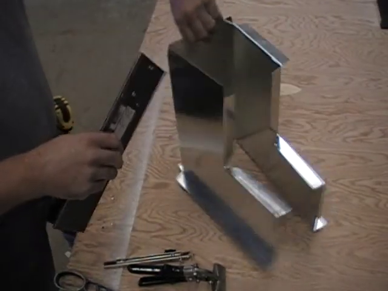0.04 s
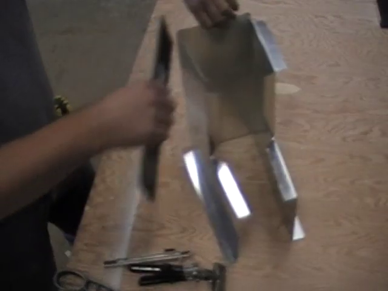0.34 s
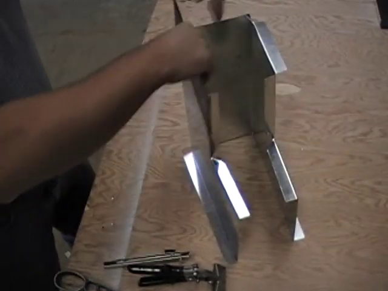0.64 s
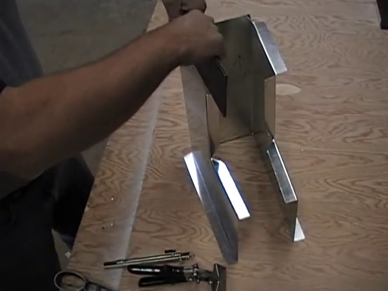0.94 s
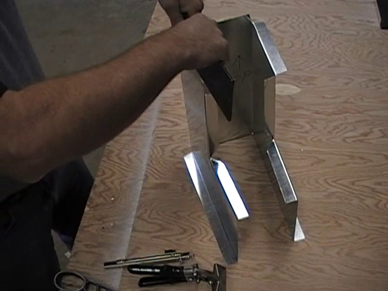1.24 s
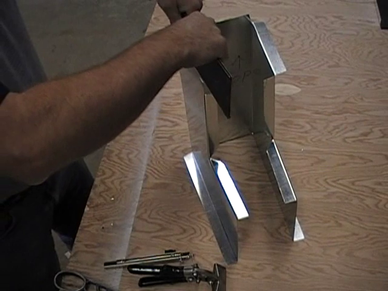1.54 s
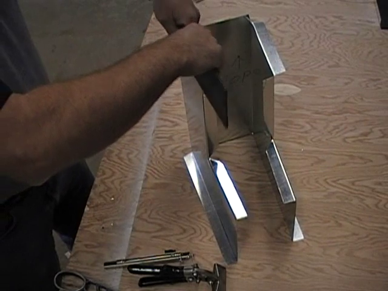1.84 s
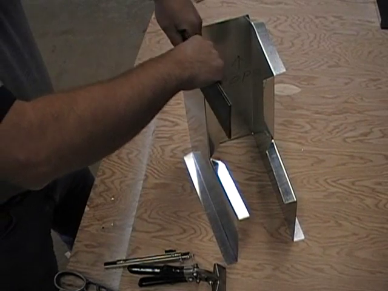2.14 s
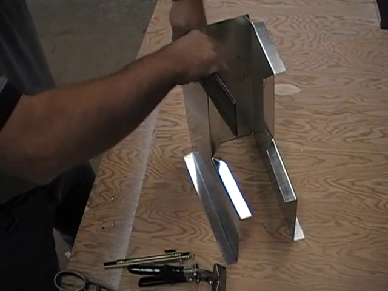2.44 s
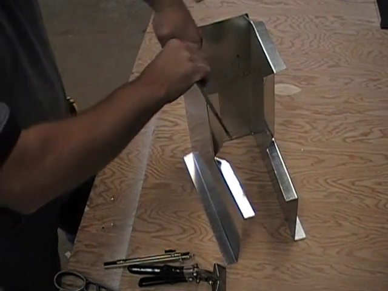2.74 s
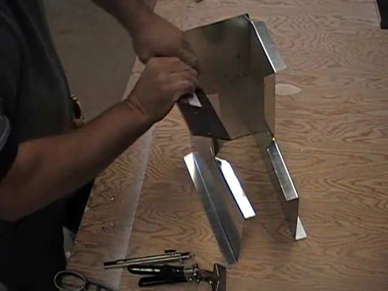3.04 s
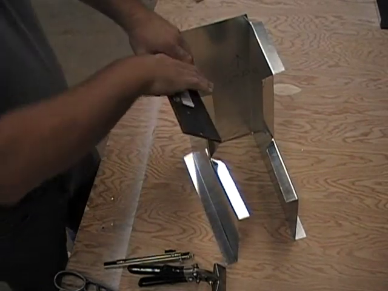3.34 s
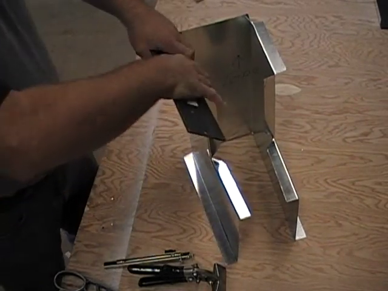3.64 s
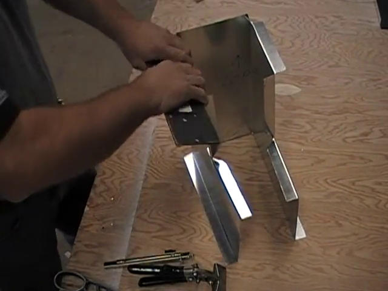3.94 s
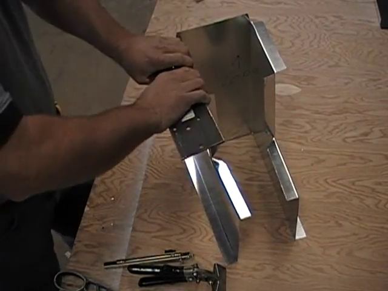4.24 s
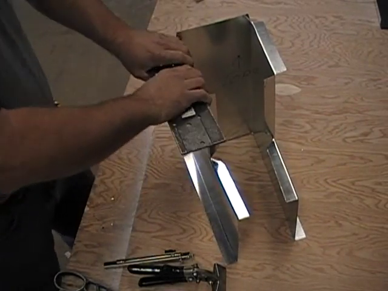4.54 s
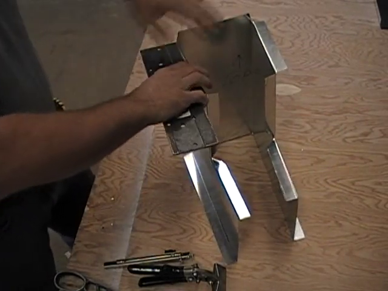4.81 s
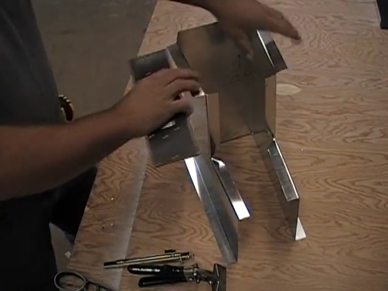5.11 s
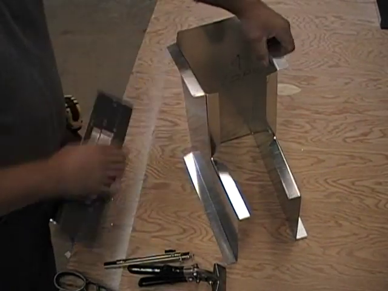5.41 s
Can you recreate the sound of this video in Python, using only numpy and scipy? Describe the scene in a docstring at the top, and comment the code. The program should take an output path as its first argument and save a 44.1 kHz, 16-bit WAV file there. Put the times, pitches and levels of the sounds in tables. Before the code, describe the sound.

In a workshop, a thin sheet-metal box is turned and clatters down on a wooden bench. A steel folding tool grates over its edge, rings and snaps into place with a sharp knock. The panel buckles in dull thumps, among dry clicks and faint rubbing of hands. The tool scrapes off and a metal flap rings briefly. The microphone is close, with a fan rumbling steadily behind.

```python
"""A workshop, close to a wooden bench, with a fan rumbling behind. A sheet-metal box is turned round and
clatters down, each impact exciting its normal modes. A steel folding tool grates over one edge by
stick-slip friction, rings, snaps home and bends it; the panel buckles with dull thumps, the tool ticks
in its seat and hands rub the metal. The tool is scraped off again and a plucked flap rings in free
vibration. The sound is nearly mono."""
import sys
import numpy as np
from scipy import signal
from scipy.fft import rfft, irfft, next_fast_len
from scipy.io import wavfile

SR = 44100
rng = np.random.default_rng(int(sys.argv[2]) if len(sys.argv) > 2 else 0)


def bounce(signal):
    """Save signal as a 16-bit WAV file at the path given by the first command-line argument."""
    frames = np.transpose(np.atleast_2d(signal))
    limited = np.clip(frames, -1, 1)
    pcm = np.round(limited * 32767).astype(np.int16)
    wavfile.write(sys.argv[1], SR, pcm)


N = 245637
TIME = np.arange(N) / SR
BANDS_HZ = 31.25 * 2 ** (np.arange(19) / 2)


def from_db(db):
    """Amplitude ratio of a level in decibels."""
    return 10 ** (np.asarray(db) / 20)


def at_hz(points, hz):
    """Interpolation of a table on a logarithmic frequency axis."""
    points = np.array(points)
    return np.interp(np.log(hz), np.log(points[:, 0]), points[:, 1])


def add(out, start_s, sound):
    """Superposition: a sound adds to those already present."""
    start = max(round(start_s * SR), 0)
    out[:, start:start + sound.shape[1]] += sound[:, :N - start]


# the bench and the fan lie to the left: frequency_hz, left_minus_right_db
BALANCE = [(100, 3), (280, 4), (650, 2), (1300, 0.9), (10000, 0)]
def stereo_gains(hz):
    """Level difference between the channels gives a source its direction."""
    return from_db(at_hz(BALANCE, hz) * np.array([[.5], [-.5]]))


def band_bank(spacing_hz, modal_share, width):
    """A thin plate has constant modal density: such modes over diffuse noise, in half-octave bands."""
    size = next_fast_len(N)
    hz = np.arange(size // 2 + 1) * SR / size + 1
    mode_hz = spacing_hz * np.cumsum(rng.uniform(.1, 1.9, 1000))
    is_mode = np.isin(np.arange(len(hz)), (mode_hz * size / SR).astype(int))
    share = modal_share * hz ** 2 / (hz ** 2 + 900 ** 2)  # the modes fade out below 900 Hz
    noise = rfft(rng.standard_normal((2, size))) / np.sqrt(size)
    modes = noise / abs(noise) * np.sqrt(share * is_mode / is_mode.mean())
    mid, side = noise * np.sqrt(1 - share) + modes
    stereo = mid + width * side * [[1], [-1]]
    bands = []
    for centre_hz in BANDS_HZ:
        triangle = np.maximum(1 - 2 * abs(np.log2(hz / centre_hz)), 0)
        band = irfft(stereo * triangle, size)[:, :N]
        bands.append(band / band.std() * stereo_gains(centre_hz))
    return np.array(bands, dtype=np.float32)


# decay of the dense upper modes and the room, at a ring_scale of 1: frequency_hz, t60_s
DENSE_DECAY = [(100, 1.19), (300, 1.71), (700, 1.344), (1800, 1.05), (4800, 0.6), (13000, 0.47)]
# share of the crack in a blow: frequency_hz, level_db
CRACK_SPECTRUM = [(100, 1.5), (600, 2), (2000, -16), (5000, -8), (10000, -1)]
def dense_ring(bank, start_s, band_db, ring_scale, crack_db, crack_s):
    """Frequency-dependent damping: after a brief crack, each band of modes decays at its own rate."""
    start = max(round(start_s * SR), 0)
    bands = bank[:, :, start:start + 3 * SR // 2]
    t = TIME[:bands.shape[2]].astype(np.float32)
    decay = np.float32(np.log(1000) / (at_hz(DENSE_DECAY, BANDS_HZ) * ring_scale))[:, None]
    crack = np.float32(from_db(crack_db + at_hz(CRACK_SPECTRUM, BANDS_HZ)))[:, None]
    attack = 1 - np.exp(-t / (0.021 * crack_s))
    envelope = (np.exp(-decay * t) + crack * np.exp(-t / crack_s)) * attack
    return np.einsum("bct,bt->ct", bands, envelope * np.float32(from_db(band_db))[:, None])


def modal_ring(modes, level_db, ring_scale, scatter_db, flex=0.00819):
    """Normal modes ring as damped sinusoids; the sheet's flexing detunes them from blow to blow."""
    hz, mode_db, t60_s = np.transpose(modes)
    t = TIME[:2 * SR].astype(np.float32)
    strength, sign, detune = rng.standard_normal((len(hz), 3)).T
    gains = np.sqrt(2) * from_db(mode_db + level_db + scatter_db * strength) * np.sign(sign)
    omega = np.float32(2 * np.pi * hz * (1 + flex * detune))[:, None]
    decay = np.float32(np.log(1000) / (t60_s * ring_scale))[:, None]
    return (stereo_gains(hz) * gains) @ (np.sin(omega * t) * np.exp(-decay * t))


# broadband rumble of the fan: frequency_hz, band_level_db
FAN_SPECTRUM = [(30, -78), (45, -69), (65, -69), (90, -59), (125, -57), (280, -57), (450, -57), (750, -53),
                (1200, -59), (2000, -63), (2900, -70), (5000, -73), (8000, -72), (11300, -79), (16000, -92)]
# drones of the fan: pitch_hz, width_hz, level_db
FAN_DRONES = [(43.8, 2.5, -59), (95.3, 5.4, -50.5)]
def fan(air):
    """Steady broadband noise, with drones that waver as narrow-band noise does."""
    out = np.einsum("bct,b->ct", air, np.float32(from_db(at_hz(FAN_SPECTRUM, BANDS_HZ))))
    for hz, width_hz, level_db in FAN_DRONES:
        bandpass = signal.butter(2, [hz - width_hz / 2, hz + width_hz / 2], "band", fs=SR, output="sos")
        drone = signal.sosfilt(bandpass, rng.standard_normal(N + SR))[SR:]
        out = out + from_db(level_db) * stereo_gains(hz) * drone / drone.std()
    return out


def slips(per_s, spread_db):
    """Stick-slip friction: a random train of uneven impulses, rms 1."""
    clicks = (rng.random(N) < per_s / SR) * rng.choice([-1, 1], N)
    clicks = clicks * from_db(spread_db * np.minimum(rng.exponential(1, N), 4))
    return clicks / clicks.std()


def through_sheet(force, bank, spectrum, ring_scale, direct_db):
    """Convolution of a force with the sheet's impulse response: a direct click and a damped ring."""
    band_db = at_hz(spectrum, BANDS_HZ)
    response = dense_ring(bank, 0, band_db, ring_scale, direct_db, crack_s=0.00096)
    response *= np.sqrt(np.sum(from_db(band_db) ** 2) / np.sum(response ** 2) * 2)
    return signal.fftconvolve(force[None], response, axes=1)[:, :N]


# steel slides on the sheet: start_s, length_s, level_db
SCRAPES = [(0.0, 0.0072, -27), (0.143, 0.066, -40), (0.278, 0.15, -32), (0.939, 0.19, -46.5),
           (1.682, 0.034, -39), (1.846, 0.19, -32.5), (4.857, 0.052, -32), (5.055, 0.088, -29.5),
           (5.18, 0.022, -39.5), (5.356, 0.24, -47.5)]
# response of the sheet to a steel edge: frequency_hz, band_level_db
EDGE_SPECTRUM = [(40, -41), (200, -24), (700, -27), (1200, -4.5), (2000, -10.5), (3000, -12), (4800, -2.5),
                 (7000, -9), (9500, -0.5), (14000, -34)]
def scrapes(plate):
    """Stick-slip of a steel edge, its burrs catching: each stroke bites, swells, holds and lets go."""
    bite_db, swell_share, release_db_per_s = -12.5, 0.6, 229
    grit = slips(per_s=1400, spread_db=2)
    burrs = from_db(-7) * slips(per_s=70, spread_db=1)
    strokes = np.zeros(N)
    for start_s, length_s, level_db in SCRAPES:
        t = TIME - start_s
        swell = np.clip(t / (swell_share * length_s), 0, 1)
        release_db = release_db_per_s * np.clip(t - length_s, 0, 1)
        strokes += (t >= 0) * from_db(level_db + bite_db * (1 - swell) - release_db)
    return through_sheet(strokes * (grit + burrs), plate, EDGE_SPECTRUM, ring_scale=0.19, direct_db=22)


# distinct modes of the box: pitch_hz, level_db, t60_s
BOX_MODES = [(121.2, -16, 2.4), (265, -16, 2.3), (296, -12, 1.98), (305, -15, 2.96), (344.5, -12.5, 0.8),
             (418, -30.5, 3.1), (495, -20, 3.95), (547.6, -17.5, 1.64), (617.5, -14.5, 1.9),
             (666, -10.5, 1.63), (744, -26, 0.74), (754, -14.5, 1.8), (820, -29, 2.2), (924, -31, 1.1),
             (1042, -18.5, 1.4), (1063, -7, 0.37), (1457, -18, 1.1), (1640, -17.5, 1.34),
             (1904, -26.5, 2.3), (2202, -17.5, 0.85), (2480, -55, 0.76), (2803, -27, 0.58),
             (2940, -13.5, 0.88), (4700, -19, 0.26)]
# dense modes of the box: frequency_hz, band_level_db
BOX_SPECTRUM = [(40, -34), (70, -28), (110, -22), (220, -16), (310, -16), (470, -17.5), (700, -12),
                (1000, -12.5), (1900, -8.5), (3000, -13), (4800, -2.5), (7000, -7.5), (9500, -2),
                (14000, -37)]
def strike(plate, start_s, force, crack_db, ring_scale):
    """Impact excitation: the force spectrum weights the box's distinct and dense modes alike."""
    sound = modal_ring(BOX_MODES, at_hz(force, np.array(BOX_MODES)[:, 0]), ring_scale, scatter_db=2)
    band_db = at_hz(force, BANDS_HZ) + at_hz(BOX_SPECTRUM, BANDS_HZ)
    dense = dense_ring(plate, start_s, band_db, ring_scale, crack_db, crack_s=0.012)
    sound[:, :dense.shape[1]] += dense
    return sound


# tool and hands hit the box: start_s, level_db, boom_db, clang_db, firmness (0 glancing, 1 pressed home)
KNOCKS = [(0.001, -26.5, -0.5, 0.5, 0.15), (0.114, -35.5, 0, 3.5, 0.25), (0.513, -36.5, 0, 5.5, 0.67),
          (1.029, -29, -7.5, 6, 0.64), (1.243, -49, -15, 4, 0.95), (1.325, -44, -12, -5, 0.89),
          (1.687, -38, -35.5, -4, 0.1), (1.899, -38.5, 1.5, 1, 0.16), (2.049, -20.5, -2, -5, 0.96),
          (4.020, -58, -8, -3, 1), (4.865, -42, -20, 0.5, 0.78), (4.896, -36, -21, 0.5, 0.5),
          (4.996, -57, -9, 3, 0.95), (5.195, -36.5, -4, 3.5, 0.71)]
def knocks(plate):
    """The point of impact sets boom and clang; firm contact cracks harder and damps the ring."""
    glancing_crack_db, firm_crack_db = -4, 8.5
    glancing_ring, firm_ring = 1.53, 0.39
    out = np.zeros((2, N))
    for start_s, level_db, boom_db, clang_db, firmness in KNOCKS:
        force = [(300, level_db + boom_db), (700, level_db + clang_db),
                 (1900, level_db), (5000, level_db - 2.5)]
        crack_db = glancing_crack_db + firmness * (firm_crack_db - glancing_crack_db)
        ring_scale = glancing_ring + firmness ** 2 * (firm_ring - glancing_ring)
        add(out, start_s, strike(plate, start_s, force, crack_db, ring_scale))
    return out


# force spectrum of the box landing on the bench: frequency_hz, level_db, loss_per_bounce_db
LANDING_FORCE = [(110, -20, 3.5), (302, -15, 4.5), (660, -16, 2.84), (1830, -27.5, 1.24),
                 (5100, -32.5, 1.7)]
def landing(plate):
    """Inelastic impacts: the box lands on an edge, slaps flat and rocks, losing bass before treble."""
    start_s, first_gap_s, gap_growth = 0.227, 0.027, 1.14
    out = np.zeros((2, N))
    for contact in range(7):
        bounces = max(contact - 1, 0)
        force = [(hz, level_db - bounces * loss_db) for hz, level_db, loss_db in LANDING_FORCE]
        crack_db, ring_scale = (14.5, 0.97) if contact == 0 else (-26, 0.61)
        add(out, start_s, strike(plate, start_s, force, crack_db, ring_scale))
        start_s += first_gap_s * gap_growth ** contact
    return out


# knocks that ring the tool: start_s, level_db
TOOL_PINGS = [(1.027, -37.5), (1.327, -45), (2.050, -37), (5.196, -40)]
# modes of the tool: pitch_hz, level_db, t60_s
TOOL_MODES = [(2770, -22, 0.55), (2960, -16.5, 1), (2990, -14, 0.62), (4240, -10, 0.28),
              (4400, -26.5, 0.93), (5700, -26, 1), (5540, -9, .55), (5840, -24, 0.63), (6900, -4, 0.36),
              (7670, -12, 0.32), (7700, -49, 0.29), (8660, -46, 0.23)]
def tool_pings():
    """Free vibration of the knocked steel tool: high, clear modes of fixed pitch."""
    out = np.zeros((2, N))
    for start_s, level_db in TOOL_PINGS:
        add(out, start_s, modal_ring(TOOL_MODES, level_db, ring_scale=1, scatter_db=1, flex=0))
    return out


# the panel buckles under the tool: start_s, level_db, upper_modes_db, ring_scale
THUMPS = [(1.755, -39.5, 6.5, 2.3), (2.497, -32, -4.5, .8), (2.527, -35, -19, 0.92),
          (3.645, -24.5, 1, 1.25), (4.018, -28.5, 4.5, 1.08), (4.653, -28, 5, 1.05),
          (4.821, -30.5, -3.5, 1.7)]
# dense modes of the buckling panel: frequency_hz, band_level_db
THUMP_SPECTRUM = [(40, -22), (80, -22), (140, -13), (290, -14), (470, -19), (700, -18.5), (1050, -25),
                  (1700, -26), (3000, -29.5), (14000, -40)]
# modes of the panel while hands hold it: pitch_hz, level_db, t60_s
HELD_MODES = [(135, -16, 0.11), (176, -14.5, 0.62), (240, -11.5, 0.95), (267, -5, 0.27), (291, -7.5, 0.96),
              (343.6, -7, 0.69), (404, -11, 0.11), (471, -8.5, 0.26), (536, -18.5, 0.37), (651, -19, 0.85),
              (743, -10.5, 0.55), (1550, -23, 0.53)]
# first swing of the panel, soon stopped by the hands: pitch_hz, level_db, t60_s
POP_MODES = [(211, -3.5, 0.066), (345.4, -0.5, 0.055), (658, -13, 0.075), (836, -13, 0.056)]
def thumps(plate):
    """Snap-through buckling of the held panel: a soft push that reaches only its low modes."""
    out = np.zeros((2, N))
    for start_s, level_db, upper_db, ring_scale in THUMPS:
        force = [(330, level_db), (700, level_db + upper_db)]
        band_db = at_hz(force, BANDS_HZ) + at_hz(THUMP_SPECTRUM, BANDS_HZ)
        dense = dense_ring(plate, start_s, band_db, 0.55 * ring_scale, crack_db=-16.5, crack_s=0.017)
        add(out, start_s, dense)
        for modes in (HELD_MODES, POP_MODES):
            drive_db = at_hz(force, np.array(modes)[:, 0]) - 3
            add(out, start_s, modal_ring(modes, drive_db, ring_scale, scatter_db=3.5))
    return signal.sosfilt(signal.butter(2, 2200, fs=SR, output="sos"), out)


# hands and tool rub lightly over the metal: start_s, length_s, level_db
RUBS = [(2.188, 0.46, -48.5), (2.576, 0.13, -58.5), (2.742, 0.18, -58), (2.855, 0.72, -67),
        (3.396, 0.12, -54.5), (3.477, 0.26, -48), (3.72, 0.45, -67.5)]
# hiss of rubbing: frequency_hz, band_level_db
RUB_SPECTRUM = [(40, -60), (900, -12), (2800, -14), (4800, -9), (8500, 1.5), (14000, -12)]
def rubs(air):
    """Sliding friction of skin and flat steel: a hiss that swells and fades with the hand's speed."""
    strokes = np.zeros(N)
    for start_s, length_s, level_db in RUBS:
        progress = np.clip((TIME - start_s) / length_s, 0, 1)
        strokes += from_db(level_db) * np.sin(np.pi * progress) ** 2
    force = strokes * slips(per_s=7500, spread_db=6)
    return through_sheet(force, air, RUB_SPECTRUM, ring_scale=0.37, direct_db=-7)


# the clamped tool shifts in its seat: start_s, level_db, low_cutoff_hz
TICKS = [(2.537, -32, 3500), (2.935, -42, 1800), (2.963, -42, 1800), (2.990, -20, 700), (2.992, -21, 1200),
         (3.748, -26, 800), (4.241, -36, 2500), (4.776, -35, 9500), (4.785, -33, 9500), (4.843, -35, 4000)]
def ticks(plate):
    """Single impulses on the sheet make dry clicks; the smallest contacts hold only treble."""
    out = np.zeros((2, N))
    click = through_sheet(np.ones(1), plate, EDGE_SPECTRUM, ring_scale=0.52, direct_db=28)
    click = click / abs(click).max()
    for start_s, level_db, low_cutoff_hz in TICKS:
        highpass = signal.butter(3, low_cutoff_hz, "high", fs=SR, output="sos")
        add(out, start_s, from_db(level_db) * signal.sosfilt(highpass, click))
    return out


# modes of the free flap: pitch_hz, level_db, t60_s
FLAP_MODES = [(685, -3.5, 0.86), (683, -10, 1.6), (764, 0, 0.62), (773, -3, 0.64), (845, -1.5, 0.51),
              (1025, -11.5, 1.6), (1079, -19, 0.52), (1092, 0.5, 1.18), (1420, -21, 3.4), (1480, -31, .6),
              (3270, -16, 1.1)]
def flap():
    """Free vibration of the plucked flap: modes close in frequency beat against each other."""
    out = np.zeros((2, N))
    note = modal_ring(FLAP_MODES, level_db=-34, ring_scale=0.96, scatter_db=0.9, flex=0)
    add(out, start_s=5.203, sound=note)
    return out


# bands in which the sheet radiates well or badly: centre_hz, width_hz, gain_db
RADIATION_BANDS = [(251, 26, 3), (345, 15, 2), (499, 49, -4), (715, 72, 3), (1265, 130, -6), (1500, 110, 3),
                   (2100, 54, 4.5), (2570, 8.8, 3), (2756, 45, 7.5), (3640, 250, -1.5), (4760, 65, -1.5),
                   (4740, 1260, 4), (5990, 76, 5), (6000, 31, 2), (8160, 140, 0.5), (9100, 220, 3),
                   (9680, 120, 4.5), (11600, 550, 4)]
def radiate(vibration):
    """Radiation efficiency: the sheet favours some bands, weakens others and gives little deep bass."""
    out = vibration
    for hz, width_hz, gain_db in RADIATION_BANDS:
        band = signal.lfilter(*signal.iirpeak(hz, hz / width_hz, fs=SR), vibration)
        out = out + (from_db(gain_db) - 1) * band
    return signal.sosfilt(signal.butter(3, 75, "high", fs=SR, output="sos"), out)


def scene():
    """Superposition of all the metalwork and the fan's rumble."""
    plate = band_bank(spacing_hz=75.25, modal_share=0.45, width=0.2)
    air = band_bank(spacing_hz=75, modal_share=0, width=0.38)
    sheet = radiate(landing(plate) + knocks(plate) + thumps(plate) + scrapes(plate) + rubs(air))
    return from_db(-1.5) * sheet + ticks(plate) + tool_pings() + flap() + fan(air)


def record(dry):
    """Clipping and band limiting: peaks stop at full scale and the highest treble is cut."""
    lowpass = signal.ellip(10, .1, 80, 15900, fs=SR, output="sos")
    return signal.sosfilt(lowpass, np.clip(dry, -1, 1))


dry = scene()
out = record(dry)
bounce(out)
```